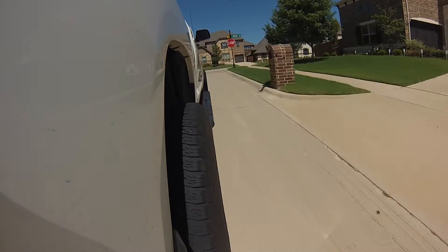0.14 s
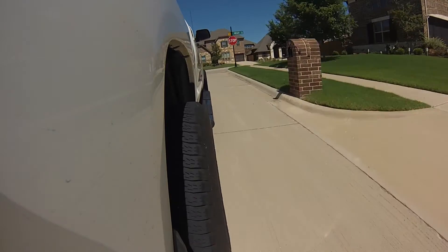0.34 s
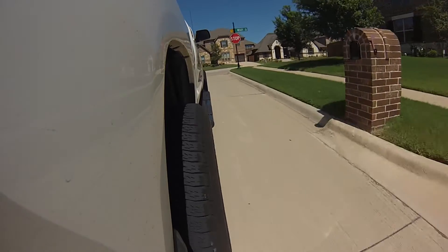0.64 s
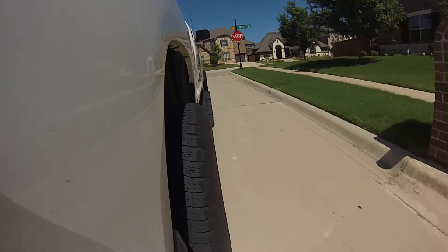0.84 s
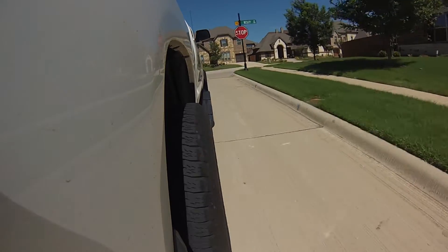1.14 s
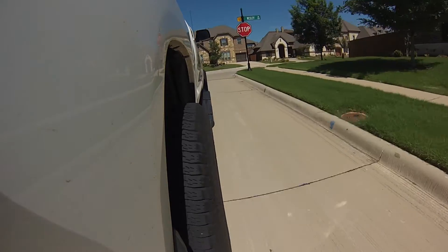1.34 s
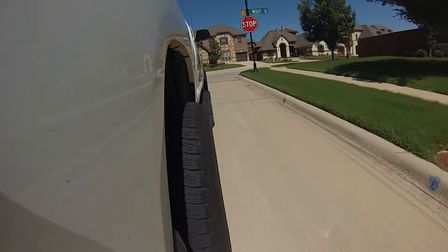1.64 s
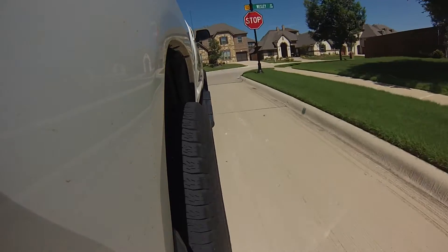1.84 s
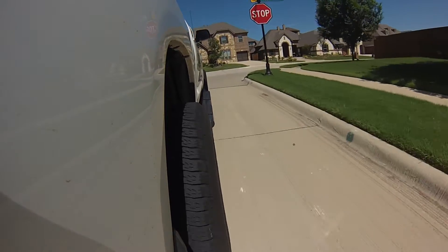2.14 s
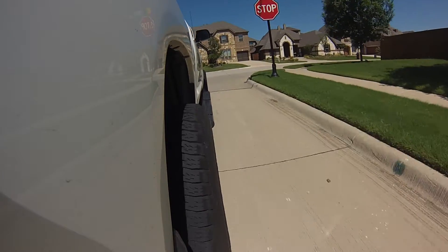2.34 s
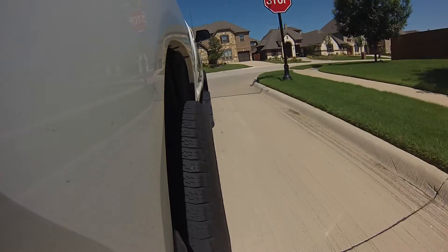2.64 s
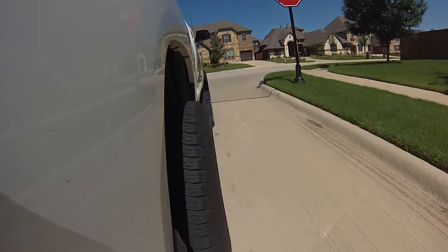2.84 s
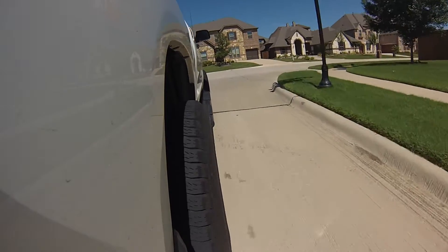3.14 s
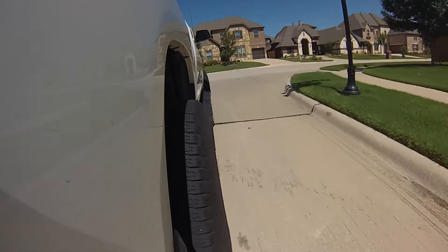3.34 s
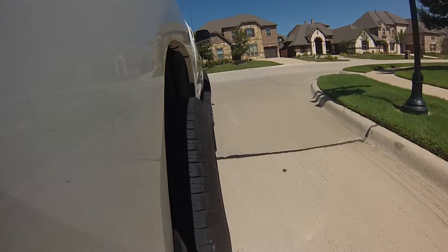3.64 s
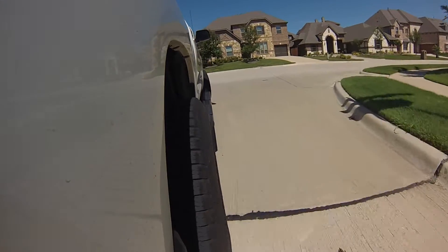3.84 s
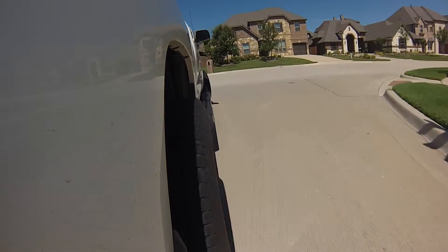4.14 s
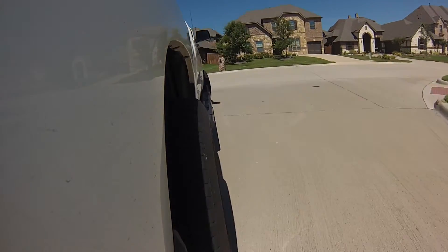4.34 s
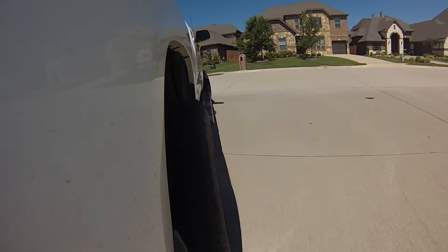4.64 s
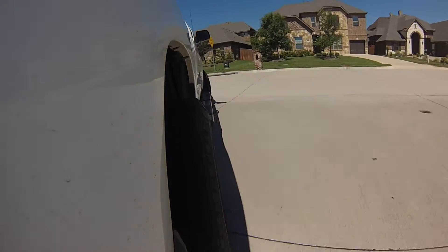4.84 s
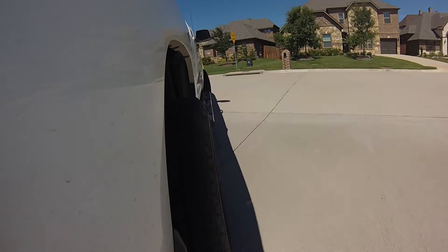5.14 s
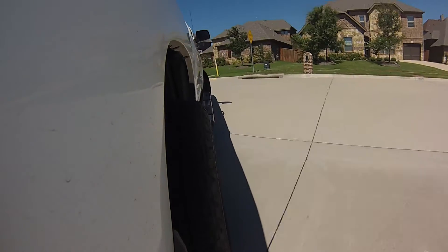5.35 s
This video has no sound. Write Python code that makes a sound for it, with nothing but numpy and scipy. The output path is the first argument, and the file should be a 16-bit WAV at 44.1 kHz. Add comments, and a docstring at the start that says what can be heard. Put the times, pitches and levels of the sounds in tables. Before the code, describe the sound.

Low, uneven exhaust rumble sinks to a quiet coast, then a raspy bark surges up, eases and starts rising again over rolling tyres.

```python
"""Lopsided eight-cylinder exhaust on concrete

A V8 pickup with an open exhaust coasts along a concrete street, then pulls under throttle. Uneven firing
pulses excite pipe resonances, partials follow the engine speed, and noise throbs with the firings as gas.
Coloured noise makes the rolling tyres, resonances the bodywork, and a low wandering sine the body shudder.
The microphone rides low on the truck's side, in buffeting air, under a faint flickering hiss."""
import sys
import numpy as np
from scipy import signal
from scipy.fft import rfft, irfft
from scipy.io import wavfile
from scipy.ndimage import uniform_filter1d

SR = 44100
rng = np.random.default_rng(int(sys.argv[2]) if len(sys.argv) > 2 else 0)


def wav_record(signal):
    """Record a signal, one row per channel, as 16-bit PCM in the file named by sys.argv[1]."""
    frames = np.transpose(np.atleast_2d(signal))
    bounded = np.clip(frames, -1, 1)
    # unit amplitude maps onto the largest positive 16-bit level
    quanta = np.round(bounded * 32767).astype(np.int16)
    wavfile.write(sys.argv[1], SR, quanta)


N = 242981


def undb(db):
    """Logarithmic levels: decibels become an amplitude gain."""
    return 10 ** (np.asarray(db) / 20)


def unit(x):
    """Normalisation: scale a signal to rms 1."""
    return x / np.sqrt(np.mean(x ** 2))


def curves(table):
    """Linear interpolation: each column of a table that starts with seconds, at every sample."""
    s, *columns = np.transpose(table)
    return [np.interp(np.arange(N) / SR, s, column) for column in columns]


def noise(points):
    """Spectral shaping: random noise of rms 1 follows a colour given in (Hz, dB) points."""
    hz, db = np.transpose(points)
    f = np.maximum(np.arange(N // 2 + 1) * SR / N, 1)
    colour_db = np.interp(np.log(f), np.log(hz), db, left=-100, right=-100)
    return unit(irfft(rfft(rng.standard_normal(N)) * undb(colour_db), N))


def ring(x, hz, width):
    """Simple resonance: a second-order peak with gain 1 at its centre."""
    b, a = signal.iirpeak(hz, hz / width, fs=SR)
    return signal.lfilter(b, a, x)


def ring_twice(x, hz, width):
    """Cascaded resonance: two equal peaks in series steepen the skirts."""
    return ring(ring(x, hz, width), hz, width)


def steady(x, span_s):
    """Level control: even out slow swells to rms 1, while the quick throb stays."""
    k = int(span_s * SR)
    power = uniform_filter1d(uniform_filter1d(x ** 2, k), k)
    return x / np.sqrt(power + 1e-18)


def walk(rate):
    """Slow random modulation: held random steps, smoothed twice and scaled to a spread near 1."""
    k = int(SR / rate)
    held = np.repeat(rng.standard_normal(N // k + 1), k)
    return unit(uniform_filter1d(uniform_filter1d(held, k), k)[:N])


def swells(table):
    """Amplitude envelope: a smooth hump of gain for each (centre s, length s, dB) row."""
    t = np.arange(N) / SR
    # the length runs between the points where the hump has fallen to 1/e
    return sum(undb(db) * np.exp(-np.abs(2 * (t - s) / length) ** 3) for s, length, db in table)


# Colour of the even hiss. Each row: frequency in Hz, relative density in dB.
HISS_COLOUR = [(200, 7), (3000, 2), (6000, 1), (9000, -0.5), (14000, -6)]
# Colour of the flickering top. Each row: frequency in Hz, relative density in dB.
FLICKER_COLOUR = [(6000, -35), (9300, -3), (10200, -2.5), (11200, 6), (11900, -5.5), (12700, 11),
                  (13500, 3), (14200, -44)]
# Longer spells of faint treble fizz. Each row: centre in seconds, length in seconds, level in dB.
FIZZ_SPELLS = [(1.12, 0.96, -83.5), (2.27, 0.17, -80.5), (2.58, 0.17, -80)]


def treble(length_s, flicker_db, hiss_db):
    """Gated noise: a faint even hiss lies under high noise that flickers in short random bursts."""
    chance = rng.standard_normal((70, 3))
    centres = np.cumsum(np.exp(0.294 * chance[:, 0])) / 10  # about ten a second
    lengths = length_s * np.exp(0.45 * chance[:, 1])
    levels_db = flicker_db + 2 * chance[:, 2]
    bursts = zip(centres, lengths, levels_db)
    flicker = noise(FLICKER_COLOUR) * np.maximum(swells(bursts), swells(FIZZ_SPELLS))
    return flicker + noise(HISS_COLOUR) * undb(hiss_db)


# Narrow resonances of the bodywork, shaken by the road. Each row: frequency in Hz, width of one pass in Hz,
# level against the rolling noise in dB.
BODY_PANELS = [(375.2, 36, -3), (856.6, 16, -14), (1393, 77, -22.5), (2150, 86, -20.5), (2282, 44, -20),
               (2927, 57, -22.5), (4470, 100, -31)]


def panels():
    """Forced vibration: broadband shaking makes each body panel sound at its own frequency."""
    shaking = rng.standard_normal(N)
    return sum(undb(db) * steady(ring_twice(shaking, hz, width), span_s=0.11)
               for hz, width, db in BODY_PANELS)


def thud(hz):
    """Band-limited impact: noise round one pitch, rms 1, with a little ring of the lowest body panel."""
    band = signal.butter(3, [0.57 * hz, 1.29 * hz], "band", fs=SR, output="sos")
    x = signal.sosfilt(band, rng.standard_normal(N))
    panel_hz, panel_width, _ = BODY_PANELS[0]
    return steady(x + ring(x, panel_hz, panel_width), span_s=0.02)


KNOCK_ATTACK_S, KNOCK_RING_S = 0.0013, 0.014  # shared rise, and decay of the note within the knock


def knock(s, hz, db, decay_s):
    """Damped impact: a tyre drops into a joint, a short ringing note inside a noisy slap."""
    age = np.maximum(np.arange(N) / SR - s, 0)
    note = np.sin(2 * np.pi * hz * age) * np.exp(-age / KNOCK_RING_S)
    envelope = np.minimum(age / KNOCK_ATTACK_S, 1) * np.exp(-age / decay_s)
    return (0.95 * thud(hz) + note) * undb(db) * envelope


# Colour of the rolling noise. Each row: frequency in Hz, relative density in dB.
TYRE_COLOUR = [(170, -43), (290, -4.5), (343, -4), (377, -4), (435, -14.5), (514, -12), (709, -12.5),
               (932, -7), (1300, -14.5), (1450, -18), (1560, -21.5), (1800, -25), (2220, -18),
               (3330, -28.5), (5000, -36), (6500, -45.5), (11000, -120)]
# Rolling noise before its random flutter. Each row: time in seconds, level in dB.
ROLL_LEVEL = [(0, -70), (1, -70), (1.8, -73), (2.6, -75.5), (3.2, -74), (4.2, -66.5), (5.5, -68.5)]
# Soft scuffs from the road. Each row: centre in seconds, length in seconds, pitch of the band in Hz,
# level in dB.
ROAD_SCUFFS = [(0.96, 0.05, 430, -71), (1.9, 0.044, 520, -69), (2.387, 0.094, 465, -69.5),
               (2.835, 0.07, 460, -68), (2.986, 0.076, 530, -67.5)]
# Tyres knock over joints in the concrete. Each row: start in seconds, pitch in Hz, level before the envelope
# in dB, decay in seconds.
JOINT_KNOCKS = [(0.667, 624, -62, 0.022), (2.138, 950, -68.5, 0.05), (2.195, 432, -59.5, .015),
                (2.347, 1010, -68, .018)]


def road():
    """Contact excitation: tyres roll on concrete, shake the bodywork, scuff and knock over joints."""
    roll_db, = curves(ROLL_LEVEL)
    scuffs = sum(thud(hz) * swells([(s, length, db)]) for s, length, hz, db in ROAD_SCUFFS)
    knocks = sum(knock(*row) for row in JOINT_KNOCKS)
    rolling = (noise(TYRE_COLOUR) + panels()) * undb(roll_db + 0.82 * walk(25))
    return rolling + scuffs + knocks


# Body shudder before its wobble and lulls. Each row: time in seconds, level in dB.
SHUDDER_LEVEL = [(0, -31.5), (.25, -39), (.6, -33), (.8, -34.5), (1.2, -43), (1.7, -40.5), (2.4, -35.5),
                 (3.1, -33), (3.56, -31.5), (3.8, -39.5), (4.13, -28), (4.3, -31), (4.5, -42), (4.86, -33),
                 (5.18, -33.5), (5.5, -41)]
# The shudder dies away for a moment. Each row: centre in seconds, length in seconds, depth in dB.
SHUDDER_LULLS = [(0.59, 0.22, -8), (1.17, 0.11, -13), (1.345, 0.045, -23), (1.735, 0.15, -5),
                 (2.631, 0.13, -30), (3.374, 0.21, -13.5), (3.753, 0.06, -5.5), (4.032, 0.12, -7.5),
                 (4.202, 0.072, -9), (4.402, 0.11, -8.5), (5.294, 0.1, -11.5)]
# Colour of the air buffeting. Each row: frequency in Hz, relative density in dB.
WIND_COLOUR = [(15, -10), (32, 0), (41, -1), (52, -10), (64, -12), (80, -19), (140, -30), (220, -42),
               (600, -64)]
SHAKE_HZ, SHAKE_WANDER_HZ, SHAKE_WOBBLE_DB = 26.7, 0.8, 1.5  # pitch, and rms drift of pitch and level


def shudder():
    """Low-frequency vibration: the body shakes at one wandering pitch while air buffets the microphone."""
    level_db, = curves(SHUDDER_LEVEL)
    level_db = level_db + SHAKE_WOBBLE_DB * walk(13)
    lull_db = sum(depth * swells([(s, length, 0)]) for s, length, depth in SHUDDER_LULLS)
    hz = SHAKE_HZ + SHAKE_WANDER_HZ * walk(4)
    start_phase = rng.uniform(0, 2 * np.pi)
    shake = np.sqrt(2) * np.sin(2 * np.pi * np.cumsum(hz) / SR + start_phase)
    wind = noise(WIND_COLOUR) * undb(level_db + lull_db / 2 - 10)  # lulls half as deep
    return undb(level_db + lull_db) * shake + wind


# Air drawn through the opening throttle. Each row: frequency in Hz, relative density in dB.
INTAKE_COLOUR = [(1800, 0), (2300, -2.5), (2600, 13), (3000, -9.5), (4000, -30), (4900, -1), (6000, -29),
                 (8500, -10), (10000, -51)]
# Swells of that air. Each row: centre in seconds, length in seconds, level in dB.
INTAKE_GULPS = [(3.29, 0.16, -82), (3.42, 0.15, -75.5)]


def intake(puffs):
    """Modulated flow noise: air rushes in through the opening throttle and throbs with the firings."""
    return unit(puffs) * noise(INTAKE_COLOUR) * swells(INTAKE_GULPS)


# Colour of the exhaust gas rush. Each row: frequency in Hz, relative density in dB.
GAS_COLOUR = [(130, -37), (220, -7.5), (298, -2), (377, -0.5), (427, -3.5), (520, -7.5), (604, -8),
              (675, -12.5), (733, -26), (796, -26.5), (1460, -13.5), (1620, -21.5), (1800, -30.5),
              (2240, -17), (2600, -21), (2770, -27), (2920, -22), (3360, -28), (4190, -40), (6000, -36.5),
              (7800, -79.5), (13200, -120)]


def gas_rush(puffs, effort_db, load):
    """Modulated jet noise: turbulent exhaust gas leaves in one puff for each firing."""
    return unit(puffs) * noise(GAS_COLOUR) * undb(effort_db - 1.0 + 1.1 * load)


# Colour of the cracks under load. Each row: frequency in Hz, relative density in dB.
RASP_COLOUR = [(400, -2.5), (900, 1), (1500, 1), (1800, -9.5), (2300, -3), (3300, -7), (4200, -20.5),
               (6000, -29), (8000, -51)]
RASP_DB, RASP_DECAY_S = -8.5, .0009  # level against effort at full load; rise and fall time


def rasp(pulses, effort_db, load):
    """Pulsed noise: under load each firing cracks, a brief burst of noise that rises and falls smoothly."""
    pole = np.exp(-1 / (RASP_DECAY_S * SR))
    cracks = signal.lfilter([1], np.poly([pole, pole]), np.cbrt(pulses))
    return unit(cracks) * noise(RASP_COLOUR) * load * undb(effort_db + RASP_DB)


def underbody(x, decay_s):
    """Diffuse reflection: quick echoes between road and chassis smear each blow."""
    t = np.arange(SR // 20) / SR
    echoes = rng.standard_normal(len(t)) * np.exp(-t / decay_s)
    return unit(signal.fftconvolve(x, echoes)[:N])


def resonances(x, table):
    """Parallel resonance: a sound rung through a table of (Hz, width Hz, dB) rows, alternating in sign."""
    return sum((-1) ** k * undb(db) * ring(x, hz, width) for k, (hz, width, db) in enumerate(table))


# Upper pipe resonances. Each row: frequency in Hz, width in Hz, gain before the band-pass in dB.
UPPER_PIPE = [(192, 35, -13), (255, 22, -2), (332, 22, -5), (381, 20, 1), (465, 30, -13), (533, 30, -9),
              (628, 22, -10), (683, 18, -1), (791, 22, -5), (863, 18, -4), (915, 24, -9), (1004, 18, -4),
              (1224, 30, -8.5), (1370, 30, -13)]


def upper_pipes(x):
    """Pipe filtering: the upper resonances answer, with the bass and treble cut away."""
    band = signal.butter(3, [190, 1500], "band", fs=SR, output="sos")
    return signal.sosfilt(band, resonances(x, UPPER_PIPE))


def buzz(cycle_hz, size=2048):
    """Periodic source: a rough pressure pattern repeats every cycle, so all its partials glide together."""
    pattern = irfft(np.exp(2j * np.pi * rng.random(size // 2 + 1)))
    cycles = np.cumsum(cycle_hz * (1 + .002 * walk(14))) / SR
    return np.interp(cycles, np.arange(size) / size, pattern, period=1)


# Pipe resonances that partials glide through. Each row: frequency in Hz, width before the skirt exponent
# in Hz, gain in dB.
SINGING_PIPE = [(78, 32, 0), (91, 10, -6), (123, 14, -4), (149.5, 20, 1), (165, 26, -22), (191, 30, -5),
                (208, 24, -10), (236, 20, -8), (254, 26, -11), (274, 20, -10)]
SKIRT = 2.12  # steepness of the skirts; 1 = a single resonance


def pipe_gain(hz):
    """Resonance curve: how strongly the pipes answer a tone of this pitch."""
    return sum(undb(db) / (1 + (2 * (hz - centre) / width) ** 2) ** SKIRT
               for centre, width, db in SINGING_PIPE)


# Multiples of the cycle rate that sing out: 8, 16 and 24 from the firing rate, the rest from uneven banks and
# cylinders. Each entry: multiple of the cycle rate, no unit.
ORDERS = [6, 7, 8, 10, 11, 13, 14, 16, 18, 19, 21, 24]
# One row for each multiple, before the pipe gain and coasting cut: level with the throttle shut in dB,
# level with it open in dB.
ORDER_LEVELS = [(-52.5, -56), (-47.5, -51.5), (-45.5, -38.5), (-52.5, -46.5), (-49, -38.5), (-54, -39.5),
                (-54.5, -51.5), (-54.5, -52), (-70, -60), (-71, -64.5), (-71, -54.5), (-70, -53.5)]
# One multiple stands out for a while. Each row: centre in seconds, length in seconds, multiple of the cycle
# rate, level before the waver in dB.
ORDER_SURGES = [(-0.004, 0.078, 8, -33.5), (0.36, 0.14, 8, -40.5), (0.59, 0.091, 8, -45),
                (1.159, 0.078, 8, -42.5), (1.95, 1.5, 19, -63), (1.99, 1.1, 10, -55),
                (2.993, 0.14, 10, -43.5), (3.176, 0.11, 16, -54), (3.261, 0.089, 14, -45.5),
                (3.405, 0.065, 7, -31.5), (3.706, 0.091, 8, -42), (3.853, 0.34, 13, -47),
                (4.774, 0.092, 13, -42)]
OPENS_S, OPENING_S = 3.14, 0.36  # the throttle opens at this time, over this span
SHUT_DB, LOAD_SPAN_DB = -70, 7  # effort with the throttle shut, and how much more makes full load


def chord(cycle_hz, load, effort_db):
    """Harmonic excitation: multiples of the cycle rate swell near pipe resonances and waver, most off load."""
    turn = 2 * np.pi * np.cumsum(cycle_hz) / SR
    throttle = np.clip((np.arange(N) / SR - OPENS_S) / OPENING_S, 0, 1)
    coasting_db = np.minimum(effort_db - SHUT_DB, 0)
    waver = .04 * (1 - .6 * load) * walk(16)  # radians of the cycle
    tones = 0
    for k, (shut_db, open_db) in zip(ORDERS, ORDER_LEVELS):
        level_db = shut_db + (open_db - shut_db) * throttle + coasting_db
        gain = pipe_gain(k * cycle_hz) * undb(level_db)
        surge = swells([(s, length, db) for s, length, multiple, db in ORDER_SURGES if round(multiple) == k])
        flutter = undb((1.8 - .3 * load) * walk(18))
        tone = np.sin(k * (turn + waver) + rng.uniform(0, 2 * np.pi))
        tones = tones + (gain + surge) * flutter * tone
    return np.sqrt(2) * tones


BOOM_HZ, BOOM_WIDTH_HZ = 74.45, 15.8  # lowest pipe resonance, width of one pass
DRONE_HZ, DRONE_WIDTH_HZ = 137.7, 25.2  # second pipe resonance, width of one pass
# boom: dB at shut-throttle effort, dB per dB of effort, change in dB at full load
BOOM_DB, BOOM_SLOPE, BOOM_LOAD_DB = -45.5, 0.7, -11
DRONE_OVER_EFFORT_DB, DRONE_TOP_DB = 17, -49.5  # the drone follows effort until it levels off


def low_pipes(lumps, effort_db, load):
    """Pipe modes: firings of changing strength ring the two lowest resonances at their own pitch."""
    boom_db = BOOM_DB + BOOM_SLOPE * (effort_db - SHUT_DB) + BOOM_LOAD_DB * load
    drone_db = np.minimum(effort_db + DRONE_OVER_EFFORT_DB, DRONE_TOP_DB)
    boom = steady(ring_twice(lumps, BOOM_HZ, BOOM_WIDTH_HZ), span_s=0.11) * undb(boom_db)
    drone = steady(ring_twice(lumps, DRONE_HZ, DRONE_WIDTH_HZ), span_s=0.041) * undb(drone_db)
    return boom + drone


# Cylinders in firing order, each with its own strength, so the beat is uneven. Each entry: strength before
# random scatter in dB.
CYLINDER_STRENGTHS = [2.5, -10, 6.5, 3.5, -8, -3, 1.5, -2]


def firings(cycle_hz, load, idle_scatter_db, load_scatter_db, jitter_s):
    """Impulse train: eight pulses a cycle, their strength and timing scattered a little less under load."""
    phase = np.cumsum(cycle_hz) * len(CYLINDER_STRENGTHS) / SR
    at = np.flatnonzero(np.diff(np.floor(phase), prepend=-1))
    chance = rng.standard_normal((len(at), 2))
    scatter_db = idle_scatter_db + (load_scatter_db - idle_scatter_db) * load[at]
    size = undb(np.resize(CYLINDER_STRENGTHS, len(at)) + scatter_db * chance[:, 0])
    late_s = jitter_s * scatter_db * chance[:, 1]  # jitter is per dB of scatter
    pulses = np.zeros(N)
    np.add.at(pulses, np.clip(at + (late_s * SR).astype(int), 0, N - 1), size)
    return pulses


# Engine speed before the uneven turning. Each row: time in seconds, four-stroke cycle rate in Hz.
ENGINE_SPEED = [(0.0, 8.98), (0.6, 10.2), (0.85, 9.5), (1.15, 8.6), (1.45, 7.22), (2.55, 7.22), (3.1, 7.6),
                (3.2, 8.2), (3.3, 9.55), (3.42, 10.72), (3.6, 11.15), (3.75, 11.63), (3.9, 12.17),
                (4.1, 13.05), (4.22, 12.94), (4.45, 12.79), (4.6, 12.03), (4.8, 11.34), (5.0, 10.3),
                (5.15, 10.38), (5.51, 10.91)]
# Engine effort, heard as the rush of exhaust gas. Each row: time in seconds, reference level in dB.
ENGINE_EFFORT = [(0.05, -69), (1.0, -71), (1.7, -78.5), (2.38, -79), (2.67, -84.5), (3.12, -76.5),
                 (3.28, -68), (3.41, -61.5), (3.54, -63.5), (3.7, -62), (4.28, -60.5), (5.05, -65.5),
                 (5.48, -64.5)]
HOWL_DB, HOWL_LOAD_DB = -6, 10  # gliding upper partials: level against effort off load, rise at full load
PUFF_DEPTH = .35  # how deeply the firings chop the gas rush (0-1)


def exhaust():
    """Source and filter: firings boom, drone and bark in the pipes and release puffs of gas."""
    (cycle_hz,), (effort_db,) = curves(ENGINE_SPEED), curves(ENGINE_EFFORT)
    load = np.clip((effort_db - SHUT_DB) / LOAD_SPAN_DB, 0, 1)
    # the crank turns unevenly with the throttle shut
    crank_hz = cycle_hz * (1 + (.025 - .023 * load) * walk(18))
    pulses = firings(crank_hz, load, idle_scatter_db=2.5, load_scatter_db=2.0, jitter_s=.00009)
    lumps = pulses * (.8 + rng.standard_normal(N))  # firings of changing strength
    blows = 0.42 * unit(pulses) + 0.37 * unit(lumps) + underbody(lumps, decay_s=0.023)
    bark = steady(upper_pipes(blows), span_s=0.14) * undb(effort_db - 5.0 + 1.4 * load)
    howl_db = effort_db + HOWL_DB + HOWL_LOAD_DB * load
    howl = steady(upper_pipes(buzz(cycle_hz)), span_s=0.11) * undb(howl_db)
    firing_phase = 2 * np.pi * len(CYLINDER_STRENGTHS) * np.cumsum(crank_hz) / SR
    puffs = (1 + PUFF_DEPTH * np.cos(firing_phase)) * undb(1.2 * walk(240))
    pipes = chord(cycle_hz, load, effort_db) + low_pipes(lumps, effort_db, load) + bark + howl
    return pipes + gas_rush(puffs, effort_db, load) + rasp(pulses, effort_db, load) + intake(puffs)


def scene():
    """Superposition: every source adds at the microphone on the truck's side."""
    fizz = treble(length_s=0.017, flicker_db=-78.0, hiss_db=-81.5)
    return (fizz + road() + shudder() + exhaust())[None]


TOP_HZ = 13900


def record(dry):
    """Band limiting: a steep elliptic low-pass cuts the top."""
    return signal.sosfilt(signal.ellip(8, .2, 70, TOP_HZ, fs=SR, output="sos"), dry)


dry = scene()
out = record(dry)
wav_record(out)
```